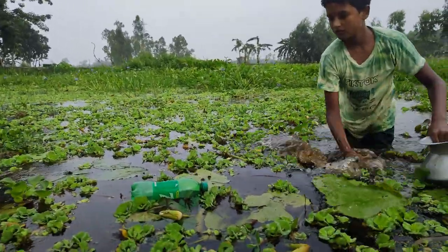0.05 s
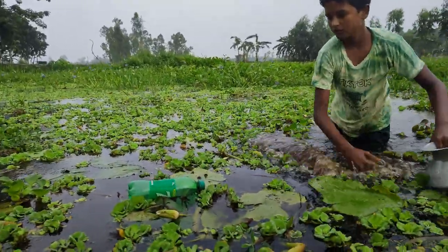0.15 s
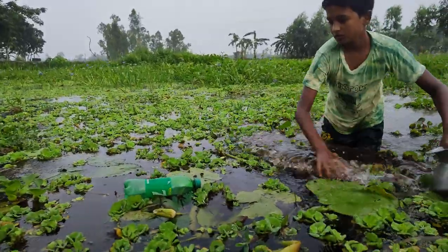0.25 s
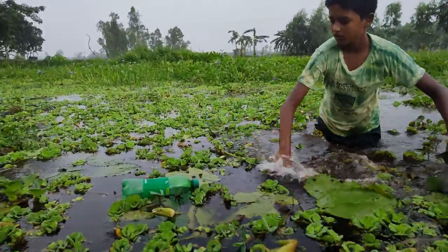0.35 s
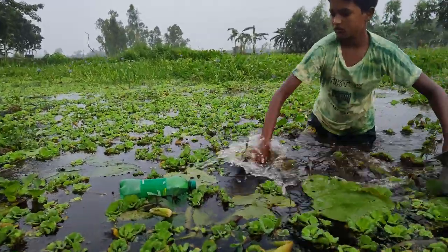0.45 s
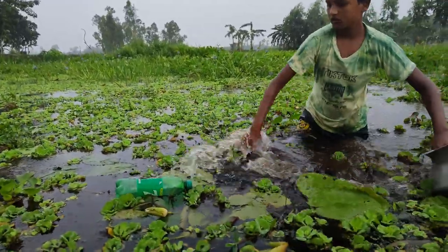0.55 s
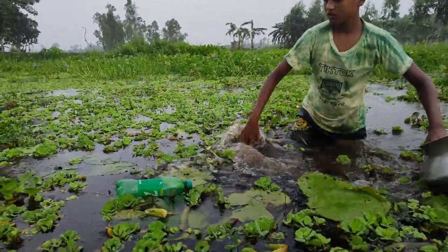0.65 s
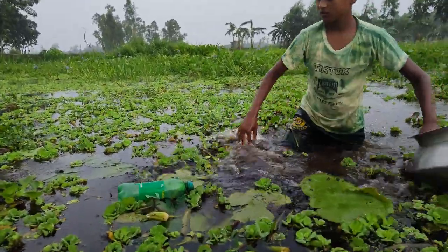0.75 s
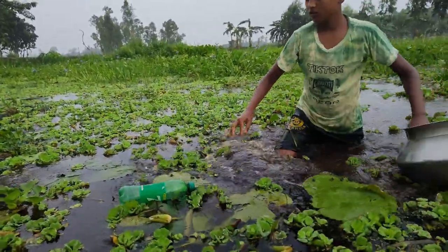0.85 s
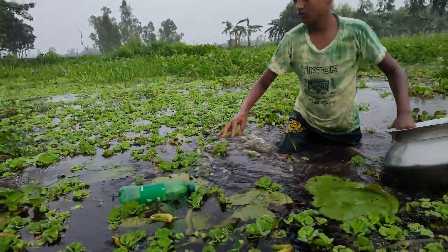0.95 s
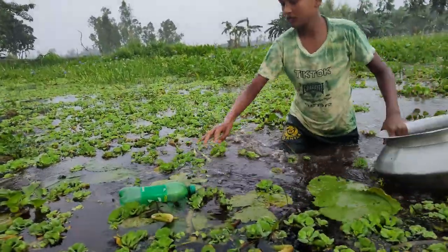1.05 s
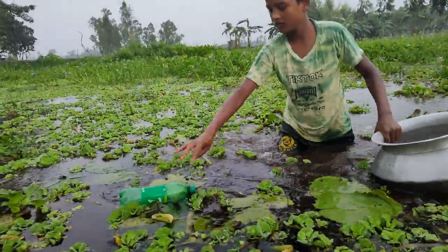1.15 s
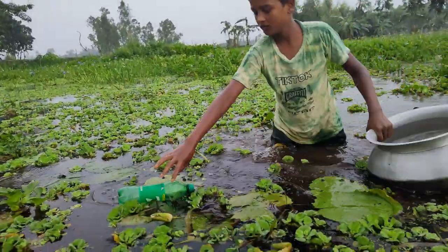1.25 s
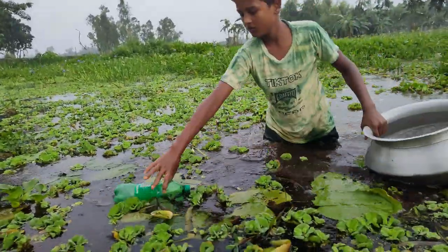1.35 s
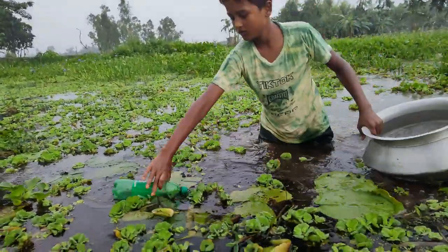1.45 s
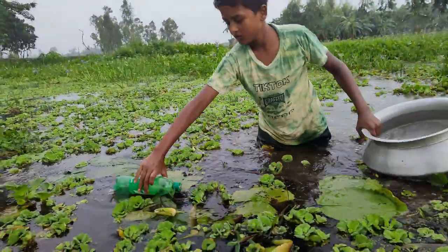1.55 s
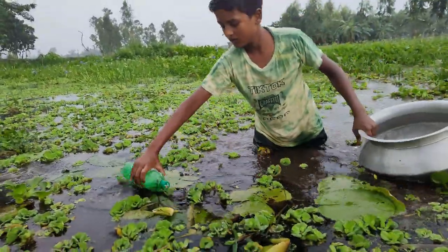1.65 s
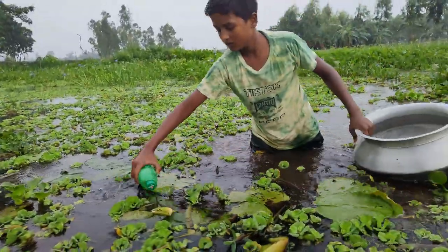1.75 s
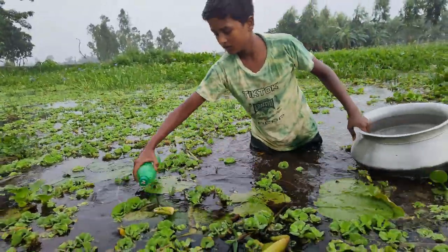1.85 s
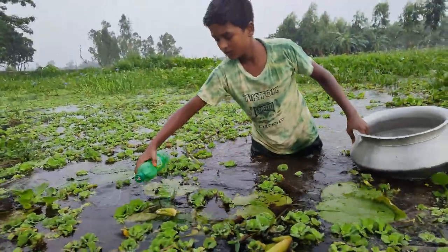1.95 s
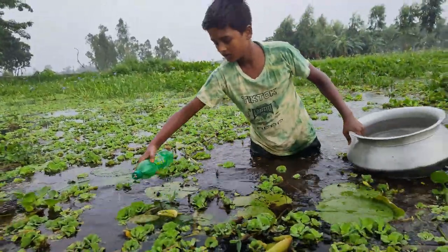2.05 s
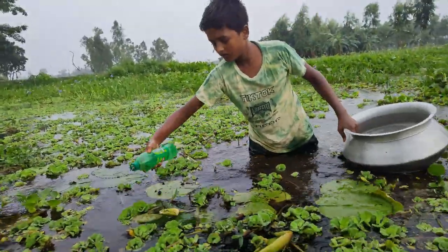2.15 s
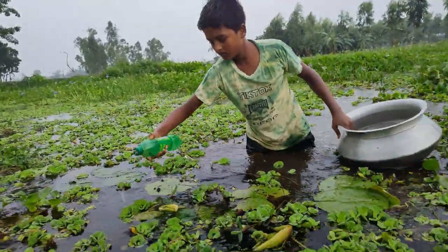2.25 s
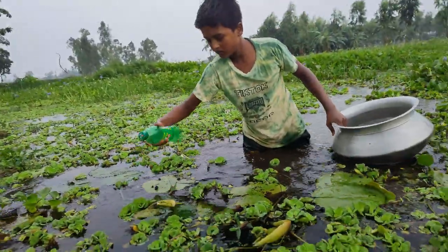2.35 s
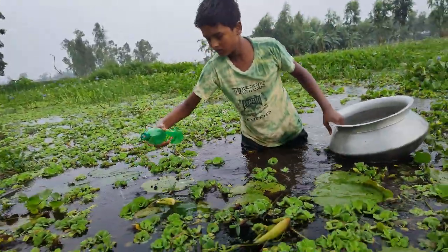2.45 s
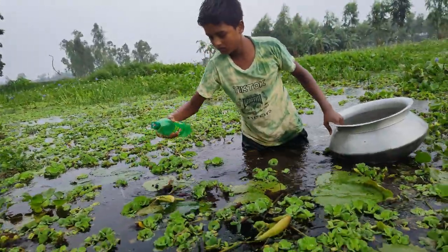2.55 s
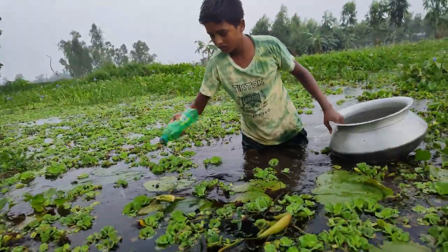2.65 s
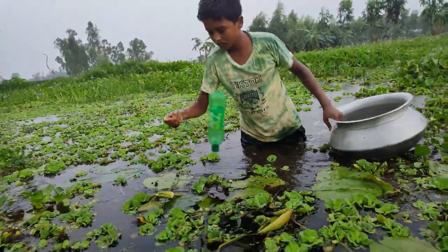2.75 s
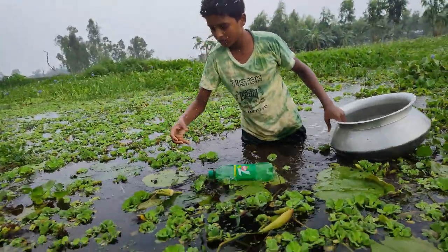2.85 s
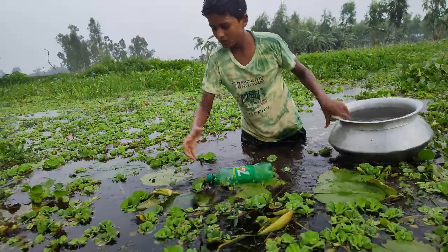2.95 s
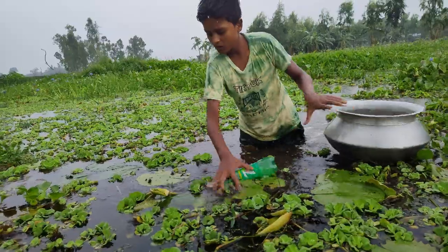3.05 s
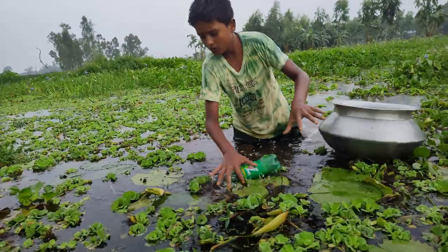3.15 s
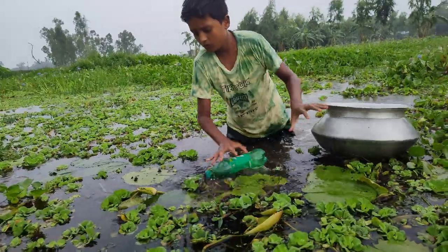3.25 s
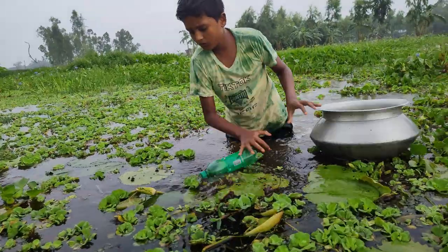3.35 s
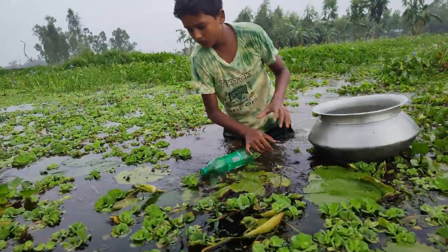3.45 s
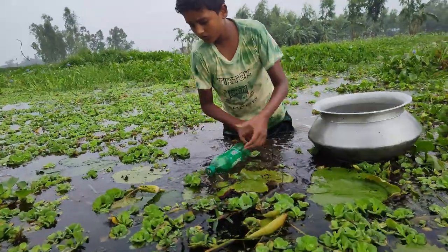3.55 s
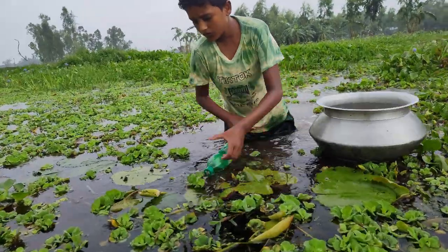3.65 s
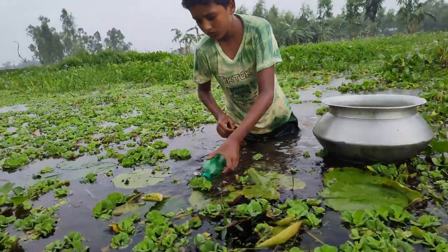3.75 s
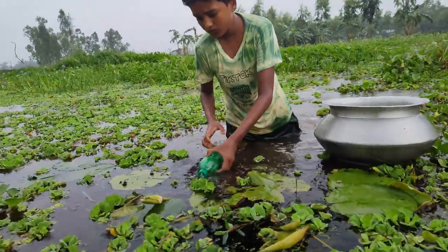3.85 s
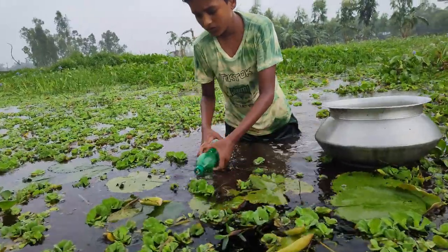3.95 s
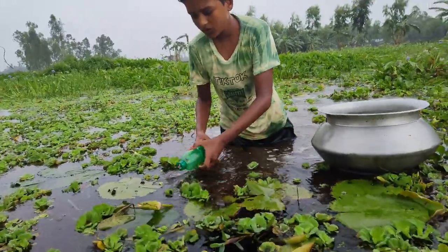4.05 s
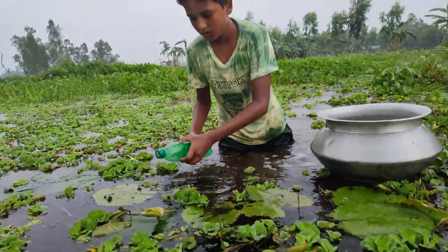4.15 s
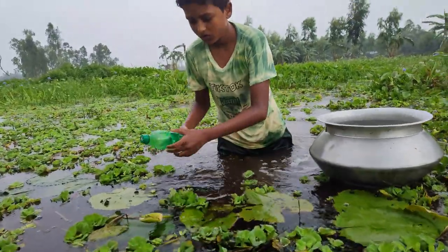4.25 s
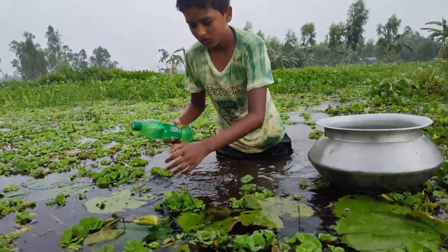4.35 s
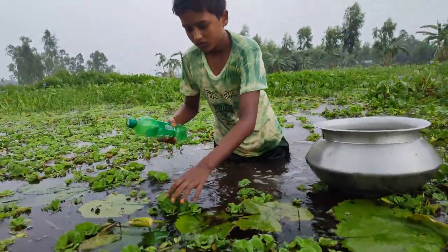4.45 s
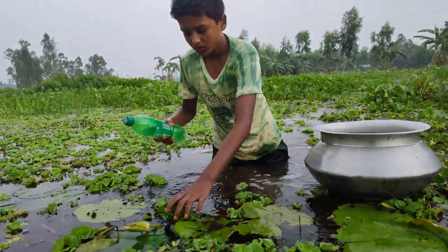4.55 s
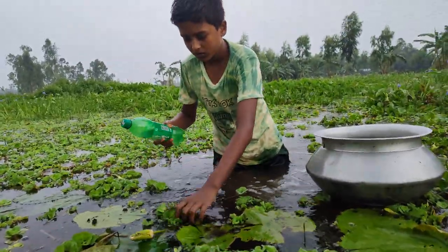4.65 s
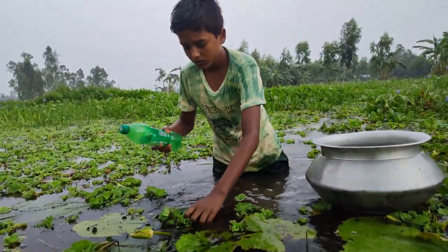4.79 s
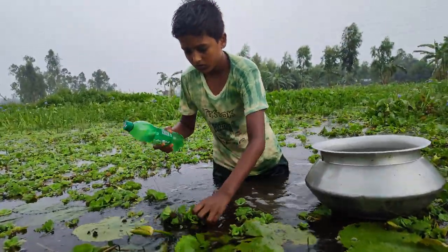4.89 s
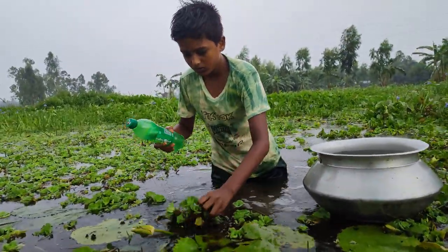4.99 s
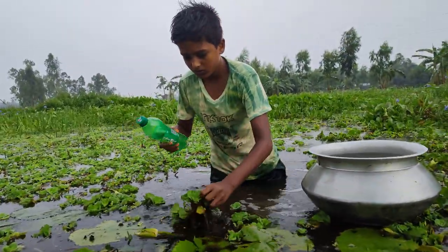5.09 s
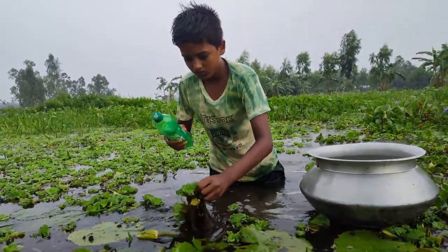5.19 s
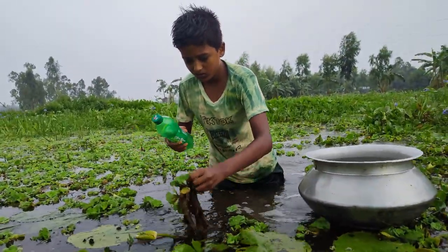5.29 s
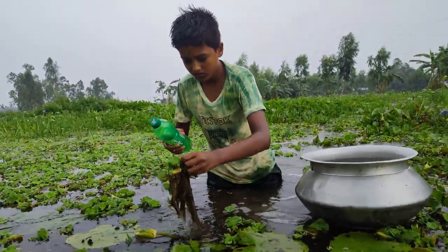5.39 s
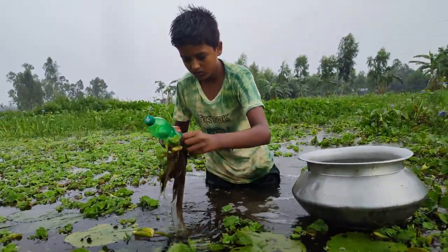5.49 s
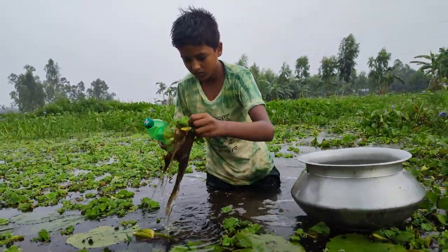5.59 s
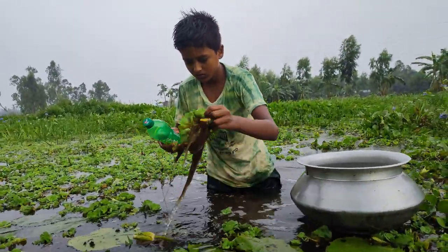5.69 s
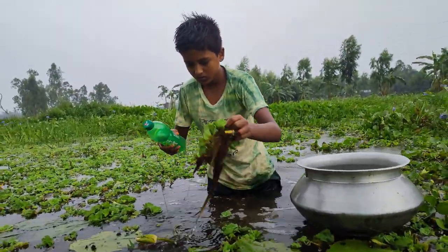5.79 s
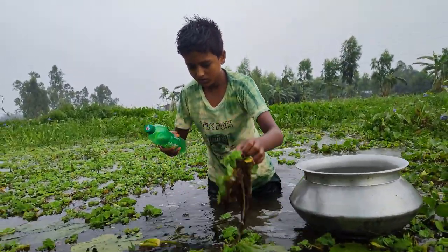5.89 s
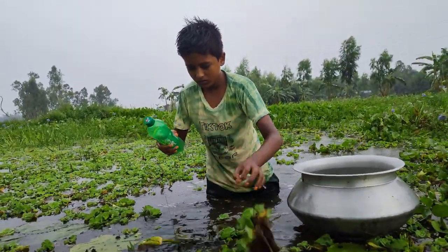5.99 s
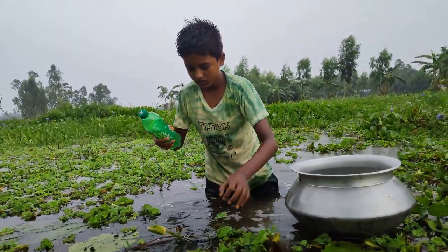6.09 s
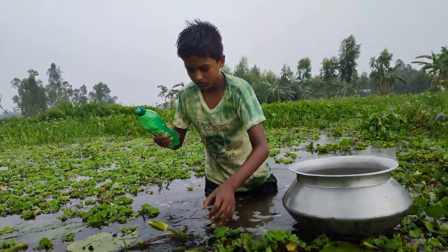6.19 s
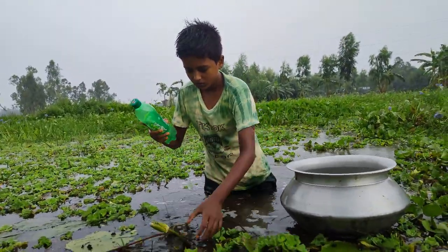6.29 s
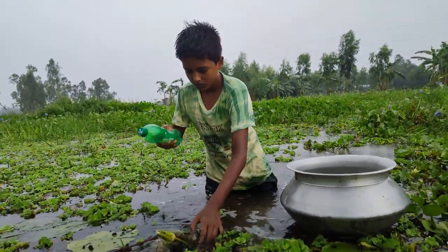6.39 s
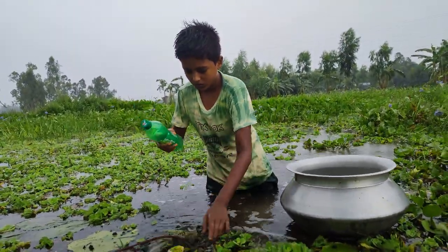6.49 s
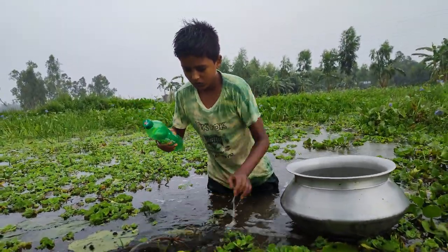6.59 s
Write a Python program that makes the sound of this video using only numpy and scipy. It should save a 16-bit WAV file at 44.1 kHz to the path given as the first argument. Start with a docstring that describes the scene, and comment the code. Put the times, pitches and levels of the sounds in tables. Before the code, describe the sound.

Hands churn pond water with plops and slaps, calm briefly, a bottle smacks down, then wet weed trickles over a faint distant engine.

```python
"""Wading in a weedy pond, under a steady airy hiss with a low hum, and a far engine of pulsed, ringing thuds.
From the start strokes of limbs swell swarms of ringing bubbles and spray, with plops and slaps on top.
Near 3 s a hollow plastic bottle is flicked, whirrs as a wavering tone and lands with a ringing slap;
a faint whistle follows. From about 5 s a lifted clump of weed gurgles, trickles and drips."""
import sys
import numpy as np
from scipy import signal
from scipy.fft import rfft, irfft
from scipy.io import wavfile

SR = 44100
rng = np.random.default_rng(int(sys.argv[2]) if len(sys.argv) > 2 else 0)


def wrap_up_sound(samples):
    """Save the sound to the file named by the first command line argument, as 16-bit audio."""
    columns = np.atleast_2d(samples).T
    # keep every value between -1 and 1, then stretch to whole-number steps
    tamed = np.clip(columns, -1, 1)
    steps = np.round(tamed * 32767).astype(np.int16)
    wavfile.write(sys.argv[1], SR, steps)


N = 292383
TIME = np.arange(N) / SR

# spectrum of small bubbles (pitch_hz, relative_db per Hz)
SMALL_BUBBLE_SPECTRUM = [(480, -17.5), (740, 1), (950, -0.5), (1200, -5.5), (1700, 2.5), (2300, -1.5),
                         (3100, -0.5), (4000, -12.5), (5000, -17.5)]


def gain_of(db):
    """Turns decibels into an amplitude gain."""
    return 10 ** (np.asarray(db) / 20)


def evened(x):
    """Scales a signal to rms 1."""
    return x / np.sqrt(np.mean(x ** 2) + 1e-20)


def read(points, hz):
    """Interpolates a (frequency_hz, value) table on a log-frequency axis."""
    f, value = np.transpose(points)
    return np.interp(np.log(hz + 1), np.log(f + 1), value)


def add(mix, start_s, sound):
    """Mixes a sound in at start_s."""
    part = mix[max(round(start_s * SR), 0):][:len(sound)]
    part += sound[:len(part)]


def around(hz):
    """Gives a spectrum with one broad hump at hz."""
    return [(hz / 20, -50), (hz / 2, -17), (hz, 0), (hz * 1.5, -7), (hz * 3, -24), (hz * 10, -55)]


def noise(spectrum, size, tilt_db=0):
    """Shapes white noise to a spectrum, tilted by tilt_db an octave, at rms 1."""
    hz = np.fft.rfftfreq(size, 1 / SR)
    shape = gain_of(read(spectrum, hz) + tilt_db * np.log2(hz + 1))
    return evened(irfft(rfft(rng.standard_normal(size)) * shape, size))


def drift(rate_hz):
    """Wanders at random, with no movement faster than rate_hz, at rms 1."""
    slow = np.fft.rfftfreq(N, 1 / SR) < rate_hz
    return evened(irfft(rfft(rng.standard_normal(N)) * slow, N))


def surge(t, hold, swell, decay):
    """An envelope that swells exponentially up to t = 0, holds, and dies away."""
    return np.exp(np.minimum(t, 0) / swell - np.maximum(t - hold, 0) / decay)


def ring(hz, t60, onset, glide=0):
    """A decaying sine: swells over onset seconds, glides at first by glide octaves a second."""
    t = np.arange(int(SR * (t60 + onset)) + 2) / SR
    turns = np.cumsum(hz * (1 + np.log(2) * glide * t)) / SR
    swell = np.sin(np.pi / 2 * np.minimum(t / onset, 1)) ** 2
    decay = np.exp(-np.log(1000) * np.maximum(t - onset, 0) / t60)
    return swell * decay * np.sin(2 * np.pi * turns)


def swarm(spectrum, per_s, cycles, rise, spread_db, count):
    """Bubbles of count sizes at chance moments, each rising up to rise octaves per t60 near the surface."""
    out = np.zeros(N)
    number = round(per_s / count * N / SR)  # bubbles of each size
    for hz in np.geomspace(spectrum[0][0], spectrum[-1][0], count):
        when = rng.integers(0, N, number)
        force = np.minimum(rng.exponential(1, number), 3)
        births = np.bincount(when, gain_of(spread_db * force), N)
        t60 = cycles * rng.uniform(1.0, 1.75) / hz
        bubble = ring(hz, t60, 1 / hz, rise * rng.random() / t60)
        # the root of hz makes up for the wider spacing of the higher pitches
        level = gain_of(read(spectrum, hz)) * np.sqrt(hz)
        out += level * evened(signal.oaconvolve(births, bubble)[:N])
    return evened(out)


def scatter(x, t60):
    """Dense little reflections off the ripples and leaves, as a decaying noise echo."""
    t = np.arange(int(SR * t60)) / SR
    taps = rng.standard_normal(len(t)) * np.exp(-np.log(1000) * t / t60)
    return signal.oaconvolve(x, taps / np.linalg.norm(taps))[:N]


def ports(x, other):
    """Two microphone ports are most alike from 120 to 350 Hz, and differ in deep rumble and treble."""
    # left-right likeness (frequency_hz, likeness from 0 to 1)
    likeness = [(30, 0.2), (70, 0.46), (120, 1), (350, 0.98), (900, 0.72), (1500, 0.29), (3000, 0.1),
                (6000, 0.021)]
    # tilt of level between the ports (frequency_hz, left_minus_right_db)
    balance = [(30, 0.5), (70, -1), (130, -0.5), (350, -.5), (800, 2.5), (1100, -2), (1650, -1),
               (2150, -8.5), (2800, -4.5), (4000, -5), (5700, -5), (8000, -5.5), (10000, 0.5),
               (13000, -5.5)]
    # phase by which left leads (frequency_hz, lead_radians)
    lead = [(100, 0.015), (500, 0.63), (1200, 0.92), (3000, 0.94), (6000, 0.056)]
    hz = np.fft.rfftfreq(N, 1 / SR)
    same = np.clip(read(likeness, hz), 0, .99)
    mid = rfft(x)
    side = rfft(other) * np.sqrt((1 - same) / (1 + same))
    # half of each difference goes to either port
    lean = gain_of(read(balance, hz) / 2) * np.exp(.5j * read(lead, hz))
    return irfft(np.array([(mid + side) * lean, (mid - side) / lean]), N)


def fields():
    """A steady hum and hiss, ripples lapping among weeds, and rumbling puffs of air on the microphone."""
    # steady background noise: a low engine hum near 150 Hz under an airy hiss
    # (frequency_hz, relative_db per Hz)
    background_spectrum = [(20, -26), (93, -15), (150, 9.5), (234, -6.5), (320, -1.5), (640, -63),
                           (800, -21), (1120, -17.5), (2080, -4), (3070, -5), (4200, -10), (5080, -30),
                           (9500, -27.5), (15500, -62)]
    # rumble of moving air (frequency_hz, relative_db per Hz)
    rumble_spectrum = [(10, -9), (30, 1.5), (70, -1), (130, -22), (260, -22), (1000, -54)]
    # puffs over the light breeze (peak_s, level_db, swell_s)
    puff_rows = [(.015, -46.5, 0.074), (.31, -49, 0.039), (1.025, -50, 0.013), (4.05, -62, 0.16)]
    breeze_db, puff_decay_s = -72, 0.04
    background_db, lapping_db = -58.5, -65
    wind = gain_of(breeze_db)
    for peak_s, level_db, swell_s in puff_rows:
        wind = wind + gain_of(level_db) * surge(TIME - peak_s, 0, swell_s, puff_decay_s)
    ripples = gain_of(1.5 * drift(rate_hz=6))
    lapping = ripples * swarm(SMALL_BUBBLE_SPECTRUM, per_s=300, cycles=30, rise=.3, spread_db=3, count=26)
    background = gain_of(background_db + .5 * drift(rate_hz=14)) * noise(background_spectrum, N)
    return background + gain_of(lapping_db) * lapping + wind * noise(rumble_spectrum, N)


def far_engine():
    """One cylinder fires steadily but with uneven force: low exhaust resonances ring, gas chuffs after."""
    # exhaust resonances (pitch_hz, relative_db, t60_s)
    exhaust_modes = [(35, -5.5, 0.2), (74.3, 0, 0.18), (134.7, 2, 0.16), (151.7, 5.5, 0.1),
                     (212, -31, 0.013), (350, -49, 0.026)]
    # loudness of the thuds and chuffs together (time_s, level_db)
    engine_level = [(0, -63.5), (2.5, -60.5), (4.5, -59.5), (5.7, -57), (6.6, -61)]
    firings_hz = 18.69
    chuff_hz, chuff_db = 131, -9.5  # level against the thuds
    chuff_share = 0.01  # part of a firing cycle in which a chuff peaks
    turns = firings_hz * (TIME + .005)
    strength = gain_of(2.7 * drift(rate_hz=12))
    firings = np.diff(np.floor(turns), prepend=0) * strength
    thuds = np.zeros(N)
    for hz, mode_db, t60 in exhaust_modes:
        thuds += gain_of(mode_db) * signal.oaconvolve(firings, ring(hz, t60, onset=0.0058))[:N]
    age = turns % 1 / chuff_share
    chuffs = strength * age * np.exp(-age) * noise(around(chuff_hz), N)
    engine = evened(evened(thuds) + gain_of(chuff_db) * evened(chuffs))
    return gain_of(np.interp(TIME, *np.transpose(engine_level))) * engine


def whistle():
    """A faint, airy whistle arches and sags in pitch just after the bottle lands."""
    start_s, length_s = 3.04, .125
    level_db, top_hz = -62, 1550
    u = np.clip((TIME - start_s) / length_s, 0, 1)
    pitch_hz = top_hz * 2 ** (-.7 * (u - .3) ** 2)  # highest at three tenths of the way
    angle = 2 * np.pi * np.cumsum(pitch_hz) / SR
    # two wandering strengths a quarter turn apart blur the tone
    airy = evened(drift(100) * np.sin(angle) + drift(100) * np.cos(angle))
    return gain_of(level_db) * np.sin(np.pi * u) * airy


def patter():
    """Fine drops keep falling from the wet weed and arm, as a swarm of brief ticks."""
    # time and level of the patter (full_s, hold_s, level_db)
    patter_span = (5.2, .98, -60)
    full_s, hold_s, level_db = patter_span
    fade_s = 0.097
    ticks = swarm(SMALL_BUBBLE_SPECTRUM[3:], per_s=450, cycles=10, rise=.3, spread_db=3, count=16)
    return gain_of(level_db) * surge(TIME - full_s, hold_s, fade_s, fade_s) * ticks


def trickle():
    """Water pours off the lifted weed and pinches off a few clear, rising bubbles."""
    # time and level of the falling thread of water (full_s, hold_s, level_db)
    trickle_span = (5.5, 0.46, -63)
    full_s, hold_s, level_db = trickle_span
    fade_s = 0.097  # it starts and stops gradually
    bubbles = swarm(SMALL_BUBBLE_SPECTRUM[1:-2], per_s=110, cycles=40, rise=.7, spread_db=1.5, count=10)
    return gain_of(level_db) * surge(TIME - full_s, hold_s, fade_s, fade_s) * bubbles


def runoff():
    """Small drops of chance size fall at chance moments from whatever is lifted, as rows like drips."""
    # water running off an arm, the bottle, the weed (start_s, length_s, level_db before the drips' trim)
    runoff_spans = [(0.998, 0.68, -57), (3.75, 0.31, -68), (4.902, 1.5, -52.5)]
    drops_per_s, spread_db = 20, 5  # strengths vary by up to the spread either way
    low_hz, high_hz = 7800, 10200
    rows = []
    for start_s, length_s, level_db in runoff_spans:
        for k, (when, small, strength) in enumerate(rng.random((64, 3))):
            delay_s = (k + when) / drops_per_s
            pitch_hz = low_hz * (high_hz / low_hz) ** small
            if delay_s < length_s:
                drop_db = level_db + spread_db * (2 * strength - 1)
                rows.append((start_s + delay_s, drop_db, pitch_hz))
    return rows


def drips():
    """A drop lands on a leaf or the surface with a small noise spatter and a very short ring."""
    # the heaviest drops (start_s, level_db before the trim, pitch_hz)
    heavy_drops = [(.074, -33, 3190), (1.019, -37.5, 1484), (1.064, -41, 3200), (1.159, -42, 2290),
                   (1.355, -46, 3080), (2.105, -38, 3020), (3.63, -40, 4070), (3.876, -39, 3210),
                   (3.929, -49, 2550), (3.97, -39, 3150), (4.26, -35, 2900), (4.516, -39, 2120),
                   (4.685, -45, 1590), (5.06, -41, 3570), (5.081, -42, 1810), (5.189, -38, 4330),
                   (5.251, -37, 3200), (5.603, -38, 3400), (5.648, -39, 3300), (5.751, -33, 3160),
                   (5.786, -38, 4340), (5.928, -41, 3900), (5.985, -41, 4150), (6.092, -35, 2750),
                   (6.125, -40, 2850), (6.187, -34, 3900), (6.289, -37, 4040), (6.365, -42, 4300),
                   (6.566, -40, 3000), (6.583, -38, 4200)]
    ring_cycles = 56
    spatter_db, spatter_s = -15.5, 0.0078  # level against the ring, decay
    trim_db = -6  # applied to every drop
    out, t = np.zeros(N), np.arange(512) / SR
    for start_s, level_db, hz in heavy_drops + runoff():
        tick = ring(hz, t60=ring_cycles / hz, onset=.001, glide=10)
        add(out, start_s, gain_of(level_db) * tick)
        spatter = np.exp(-t / spatter_s) * noise(around(hz), len(t))
        add(out, start_s, gain_of(level_db + spatter_db) * spatter)
    return gain_of(trim_db) * out


def weed_pull():
    """Water drains through the rising roots; the pockets shrink, so the gurgle climbs."""
    # pockets among the weed's roots at the moment the clump comes free (pitch_hz, relative_db per Hz)
    pocket_spectrum = [(210, -1), (280, 7), (360, -6), (460, 2.5), (580, -9), (760, -3.5), (980, -16)]
    free_s, level_db = 5.21, -56.5  # the clump comes free of the surface
    octaves_per_s = .6
    bubbles = swarm(pocket_spectrum, per_s=700, cycles=30, rise=.25, spread_db=1, count=24)
    # the swarm is played ever faster for half a second either side of coming free
    speed = 2 ** (octaves_per_s * np.clip(TIME - free_s, -.5, .5))
    climbing = np.interp(np.cumsum(speed) % N, np.arange(N), bubbles)
    return gain_of(level_db) * surge(TIME - free_s, 0, swell=0.22, decay=0.31) * climbing


def bottle():
    """The hollow bottle rings when flicked, whirrs as it turns over, and rings again on landing."""
    # whirr in the air (time_s, level_db, pitch_hz)
    whirr_points = [(2.835, -64, 124), (2.85, -47, 110), (2.89, -51, 132), (2.94, -55, 135),
                    (2.96, -72, 130)]
    # flick from the fingers, then landing (start_s, level_db, contact_s, brightness_db per octave)
    knock_rows = [(2.83, -30.5, 0.016, -2.5), (3.006, -32, 0.00079, 6.5)]
    # resonances of the hollow bottle (pitch_hz, relative_db, t60_s)
    bottle_modes = [(222.4, -5.5, 0.12), (252, -6.5, 0.034), (507, -17.5, 0.035), (755, -26, 0.028),
                    (972, -9.5, 0.035)]
    time_s, whirr_db, whirr_hz = np.transpose(whirr_points)
    turns = np.cumsum(np.interp(TIME, time_s, whirr_hz)) / SR
    out = np.interp(TIME, time_s, gain_of(whirr_db), left=0, right=0) * np.sin(2 * np.pi * turns)
    lowest_hz = bottle_modes[0][0]
    for start_s, level_db, contact_s, tilt_db in knock_rows:
        for hz, mode_db, t60 in bottle_modes:
            bright_db = tilt_db * np.log2(hz / lowest_hz)
            add(out, start_s, gain_of(level_db + mode_db + bright_db) * ring(hz, t60, contact_s))
    return out


def bloops():
    """A wide hollow swells into its note and climbs in pitch as it closes."""
    # slowly closing hollows (start_s, length_s, peak_db, start_pitch_hz, rise_octaves)
    hollow_rows = [(0.109, 0.017, -47, 428, .2), (.256, 0.017, -37, 372, 0.5),
                   (.336, 0.016, -43, 480, 0.28), (0.669, 0.013, -44, 667, 0.16),
                   (3.363, .022, -47, 362, .55), (5.687, 0.03, -51.5, 957, 0.6),
                   (6.537, 0.033, -41.5, 623, 0.75)]
    out = np.zeros(N)
    for start_s, length_s, peak_db, hz, octaves in hollow_rows:
        u = np.linspace(0, 1, int(length_s * SR))
        turns = np.cumsum(hz * 2 ** (octaves * u)) / SR
        add(out, start_s, gain_of(peak_db) * np.sin(np.pi * u) * np.sin(2 * np.pi * turns))
    return out


def splashes():
    """Each slap on the surface is a short, ragged noise burst that swells and dies."""
    # things striking the surface (peak_s, peak_rms_db, swell_s, decay_s, brightness_db per octave)
    slap_rows = [(0.102, -38.5, .001, 0.0036, -2.5), (.435, -39.5, .002, 0.0076, 1.5),
                 (.464, -30, 0.0079, .016, -5.5), (0.4646, -25, 0.00037, 0.00051, -2.5),
                 (0.563, -39.5, 0.002, 0.0025, -4), (.642, -34, 0.0022, 0.002, -5.5),
                 (1.025, -47, 0.014, 0.021, -2), (1.177, -49, .002, .01, -7),
                 (2.792, -50.5, .001, 0.0025, -0.5), (2.839, -53, 0.017, 0.0081, 1),
                 (2.962, -50.5, 0.0009, 0.0037, -5), (2.988, -45, .0015, 0.0073, 1),
                 (2.9979, -26.5, 0.00045, 0.0013, 1.5), (3.0034, -31.5, 0.00046, 0.0018, 7),
                 (3.0044, -31, 0.0046, 0.0086, -3.5), (3.198, -41, .001, 0.0036, 2),
                 (3.205, -38.5, 0.0036, 0.0067, -0.5), (3.276, -43.5, .002, 0.0039, -3.5),
                 (3.292, -43.5, 0.0076, 0.0032, -4.5), (3.327, -48, .005, 0.011, -5.5),
                 (3.492, -46, .001, 0.0015, -4), (3.78, -49.5, .0015, 0.013, -3),
                 (3.877, -51, .001, 0.0045, 1), (3.902, -51, .002, .002, -3),
                 (3.936, -48, .002, .002, -2.5), (3.989, -45, .001, .002, -2),
                 (4.004, -45, .0025, 0.0025, -1), (4.16, -44, 0.0012, .003, -8),
                 (4.377, -49.5, 0.00088, 0.0023, -4.5), (4.466, -50, 0.00063, .003, -8.5),
                 (5.704, -49, 0.0059, 0.012, -6), (5.928, -44.5, .0015, 0.0025, -5)]
    # spectrum of a slap before its brightness tilt (frequency_hz, relative_db per Hz)
    slap_spectrum = [(120, -76), (270, -10), (700, -10.5), (1150, -1), (1800, 4), (2700, 4.5), (4000, -5),
                     (6000, -7), (7100, -13), (8100, -4), (9200, -12.5), (15500, -22)]
    out, t = np.zeros(N), np.arange(SR // 4) / SR
    t = t - t[len(t) // 4]  # leaves room for the swell before the peak
    for peak_s, level_db, swell_s, decay_s, tilt_db in slap_rows:
        burst = np.exp(np.where(t < 0, t / swell_s, -t / decay_s))
        add(out, peak_s + t[0], gain_of(level_db) * burst * noise(slap_spectrum, len(t), tilt_db))
    return out * gain_of(0.39 * drift(rate_hz=1200))


def plops():
    """Water spits as each bubble pinches off, wobbles, chirps and sheds smaller ones; air pockets thud."""
    # clearest single bubbles (start_s, level_db before pitch weighting, start_pitch_hz, t60_s,
    # glide in octaves per s)
    bubble_rows = [(.134, -27, 750, 0.018, 6), (.139, -34, 442, 0.059, 20), (.158, -33.5, 723, .04, 10),
                   (0.207, -37.5, 448, 0.036, 12), (.233, -28.5, 388, 0.042, -4),
                   (.449, -32.5, 474, .046, 25), (.27, -34, 930, 0.031, 3), (.359, -38, 740, 0.047, 1),
                   (.46, -23, 1810, 0.022, 17), (.482, -34, 2880, .018, 12), (.504, -36, 783, 0.077, 2.5),
                   (.517, -36, 2960, .03, 5), (.558, -39.5, 322, 0.1, 23), (.568, -35.5, 880, 0.033, 11),
                   (.603, -30, 2600, 0.019, 12), (.607, -32, 668, 0.039, 15), (.617, -34.5, 406, 0.08, 1.5),
                   (.628, -31.5, 505, 0.062, 26), (0.641, -39, 2860, 0.025, 7),
                   (.644, -29.5, 785, 0.046, -1.5), (.66, -36, 890, .025, 12), (.684, -31, 710, 0.03, 10),
                   (.703, -35, 1990, .03, -4), (.718, -33, 600, 0.029, 7), (.736, -44, 2370, .025, 7),
                   (.749, -34, 1440, 0.036, -5), (.781, -24, 813, 0.0061, 19),
                   (.872, -34.5, 880, 0.012, 14), (.921, -41, 815, 0.048, 18),
                   (1.174, -38.5, 784, 0.099, 1), (1.207, -46, 1186, 0.064, -2),
                   (1.515, -36.5, 1810, 0.025, 8), (1.648, -39.5, 2100, 0.028, 5),
                   (2.467, -46, 1610, .03, -2), (3.008, -28.5, 980, 0.034, 13),
                   (3.173, -38.5, 1010, 0.033, -9), (3.273, -31.5, 1590, 0.025, 8),
                   (3.289, -33.5, 2080, 0.012, 25), (3.323, -32.5, 1980, 0.043, 4.5),
                   (3.399, -37, 790, 0.028, 15), (3.443, -38.5, 1810, 0.039, -7.5),
                   (3.654, -45, 1140, 0.035, -3), (3.778, -43, 844, 0.023, 2),
                   (4.001, -32, 1870, 0.0061, 14), (4.002, -43.5, 813, .025, 5), (4.147, -43, 824, 0.03, 6),
                   (4.404, -40.5, 308, 0.031, 20), (4.465, -43.5, 289, 0.27, 4.5),
                   (4.928, -52, 1340, .05, 1), (4.935, -50, 429, 0.11, 13), (5.115, -48, 710, .06, 6),
                   (5.135, -45, 396, 0.065, 12), (5.146, -50, 745, 0.087, 12),
                   (5.18, -46.5, 251.5, 0.36, 4), (5.268, -56, 416, .08, 10),
                   (5.353, -31.5, 1950, 0.032, 19), (5.443, -43.5, 2100, 0.026, 4),
                   (5.483, -44, 2000, 0.023, 3), (5.505, -51, 643, 0.11, 14), (5.519, -41.5, 2080, .05, -2),
                   (5.56, -51, 403, 0.055, 8), (5.584, -40, 2120, .05, 5.5),
                   (5.595, -40.5, 2100, .04, 39.5), (5.625, -41.5, 1330, 0.034, 8),
                   (5.67, -45, 2760, 0.037, 5), (5.708, -45, 1466, .07, 22), (5.851, -42.5, 1600, 0.02, -6),
                   (5.887, -32.5, 1010, 0.028, 28), (5.889, -43.5, 2025, 0.062, 38.5),
                   (5.913, -35, 873, 0.032, 26), (6.071, -49, 717, 0.057, 6), (6.084, -41, 1910, 0.038, 7),
                   (6.087, -44, 775, 0.036, 9), (6.139, -33.5, 1670, .035, 29),
                   (6.568, -43, 1140, 0.028, 8)]
    # water closing over a pocket of air (start_s, peak_db, pitch_hz, t60_s)
    plunge_rows = [(0.013, -43.5, 149, 0.1), (0.286, -36, 195, 0.12), (1.013, -41, 103, 0.056),
                   (3.004, -20, 256, 0.025), (3.0054, -23.5, 706, 0.019), (3.0027, -21.5, 1404, 0.021),
                   (3.0045, -23.5, 1950, 0.009), (3.193, -37.5, 178, 0.1), (3.198, -38.5, 66, 0.049),
                   (3.198, -36, 870, 0.022), (3.2, -38, 400, 0.012), (3.266, -39.5, 287, 0.029),
                   (4.04, -48, 85, 0.12), (4.115, -38.5, 148, 0.046)]
    shed_count, shed_db = 2, -17  # level against the parent
    shed_within_s, shed_octaves = .012, .5  # latest delay, farthest pitch above the parent
    spit_db, spit_peak_s = -17.5, .004  # level against the row's level_db
    chirps, out, t = np.zeros(N), np.zeros(N), np.arange(2048) / SR
    spit = t / spit_peak_s * np.exp(1 - t / spit_peak_s)
    for start_s, level_db, hz, t60, glide in bubble_rows:
        # level weighting: lower pitches are played a little louder
        strength = gain_of(level_db - 2.2 - .9 * np.log2(hz / 800))
        add(chirps, start_s, strength * ring(hz, t60, onset=.003, glide=glide))
        for late, smaller in rng.random((shed_count, 2)):
            small_hz = hz * 2 ** (shed_octaves * smaller)
            small = gain_of(shed_db) * ring(small_hz, t60=.018, onset=.002, glide=glide)
            add(chirps, start_s + shed_within_s * late, strength * small)
        add(out, start_s, gain_of(level_db + spit_db) * spit * noise(around(hz), len(t)))
    for start_s, peak_db, hz, t60 in plunge_rows:
        add(out, start_s, gain_of(peak_db) * ring(hz, t60, onset=.5 / hz))
    return out + chirps * gain_of(1.05 * drift(rate_hz=400))


def stirring():
    """Strength of slosh, gurgle and spray: strokes swell, settle and add in power to the calm water."""
    # strokes of a hand or leg, levels before the layer trims
    # (full_force_s, half_length_s, gurgle_db, slosh_db, spray_db)
    stroke_rows = [(0.006, 0.084, -46, -75, -70), (0.12, 0.053, -44.5, -45.5, -61),
                   (0.262, 0.12, -41.5, -46, -59), (0.468, 0.045, -35.5, -44, -57),
                   (0.622, 0.064, -38.5, -49.5, -59.5), (0.761, 0.06, -40, -53.5, -56),
                   (0.92, 0.057, -46.5, -60, -63.5), (1.19, 0.024, -58, -80, -78),
                   (1.76, 0.13, -56, -61.5, -76.5), (2.074, 0.18, -57.5, -62, -79),
                   (3.209, 0.023, -47, -70, -60), (3.293, 0.039, -54, -77, -72),
                   (3.525, 0.18, -56.5, -87, -77), (3.96, 0.18, -54, -87, -74.5),
                   (4.138, 0.11, -57, -71, -94), (4.95, 0.27, -58, -69, -98),
                   (5.264, 0.27, -57, -61.5, -83), (5.667, 0.12, -52.5, -64, -81),
                   (5.916, 0.14, -54, -67, -69.5), (6.173, 0.1, -53, -65, -69.5),
                   (6.56, 0.18, -50, -90, -73)]
    wake_db, wake_s = -11.5, 0.33  # the wake of a stroke laps on, much weaker
    settle_share = 1.42  # the water takes this much longer to settle than to swell
    calm_db = [[-66], [-79], [-77.5]]  # slosh, gurgle, spray round the body between strokes
    t = TIME[::64]
    power = gain_of(calm_db) ** 2
    for full_s, length_s, gurgle_db, slosh_db, spray_db in stroke_rows:
        since = t - full_s
        width_s = np.where(since < 0, length_s, settle_share * length_s)
        push = np.exp(-(since / width_s) ** 2)
        wake = gain_of(wake_db) * surge(since, 0, length_s, wake_s)
        power = power + (gain_of([[slosh_db], [gurgle_db], [spray_db]]) * (push + wake)) ** 2
    return [np.interp(TIME, t, np.sqrt(layer)) for layer in power]


def stirred_water():
    """Moving limbs shed swarms of large and small bubbles, a fine fizz and scattered droplets."""
    # spectrum of big bubbles (pitch_hz, relative_db per Hz)
    big_bubble_spectrum = [(200, -28), (280, 3), (430, 4), (600, -3), (950, -5)]
    # spectrum of droplets and fizz (frequency_hz, relative_db per Hz)
    droplet_spectrum = [(3000, 3), (4300, 7.5), (5200, 0), (6100, 8), (7100, -9.5), (8100, 7), (9000, -3),
                        (10500, -0.5), (12500, -12), (15500, -17)]
    slosh_trim_db, gurgle_trim_db, droplets_db = -4.5, -5.5, -2
    slosh, gurgle, spray = stirring()
    deep = swarm(big_bubble_spectrum, per_s=520, cycles=26, rise=.45, spread_db=2, count=20)
    small = swarm(SMALL_BUBBLE_SPECTRUM, per_s=2200, cycles=32, rise=.4, spread_db=3.2, count=44)
    droplets = swarm(droplet_spectrum, per_s=400, cycles=22, rise=.1, spread_db=4, count=20)
    fine = noise(droplet_spectrum, N) + gain_of(droplets_db) * droplets
    bubbling = gain_of(slosh_trim_db) * slosh * deep + gain_of(gurgle_trim_db) * gurgle * small
    return bubbling + spray * fine


def scene():
    """Near water sounds with a faint scattered tail, over the distant background."""
    single = plops() + bloops() + weed_pull() + patter() + drips() + trickle() + bottle() + whistle()
    near = single + stirred_water() + splashes()
    tail = gain_of(-21) * scatter(near, t60=.12)
    middle = near + tail + far_engine() + fields()
    # a wandering quarter-turn copy: single sounds come from varied directions, out of step at the ports
    out_of_step = signal.hilbert(single).imag * np.tanh(2 * drift(rate_hz=11.0))
    # fresh draws of the broad layers widen the picture
    sides = out_of_step + stirred_water() + splashes() + fields()
    return ports(middle, sides)


def record(dry):
    """The recorder's band limit, a steep low-pass filter."""
    edge_hz = 15900
    low_pass = signal.firwin(511, edge_hz, window=("kaiser", 9), fs=SR)
    return signal.oaconvolve(dry, low_pass[None], "same")


dry = scene()
out = record(dry)
wrap_up_sound(out)
```